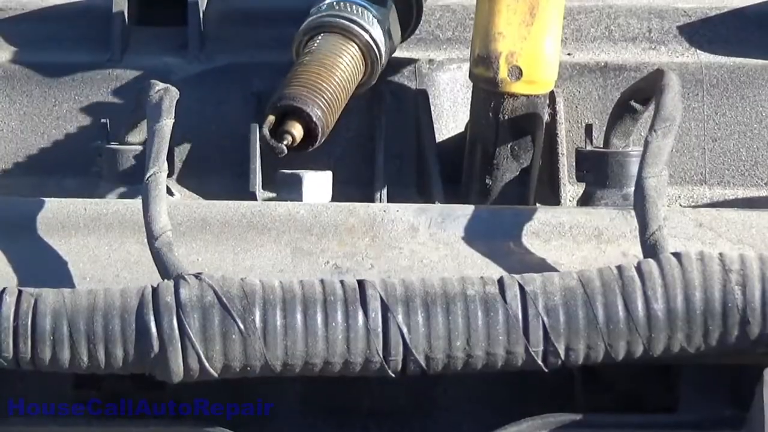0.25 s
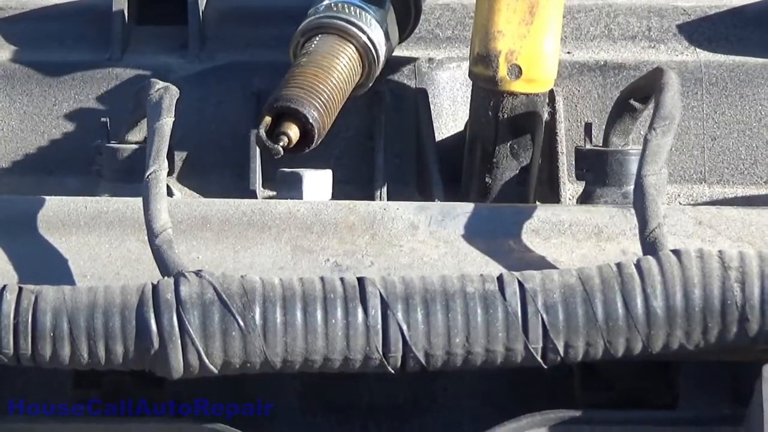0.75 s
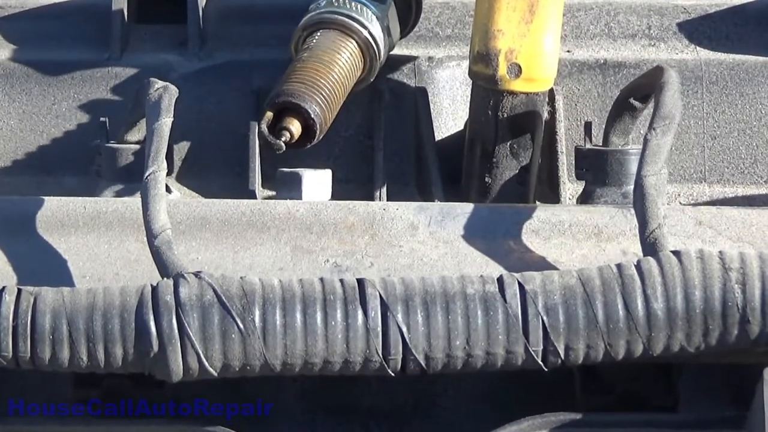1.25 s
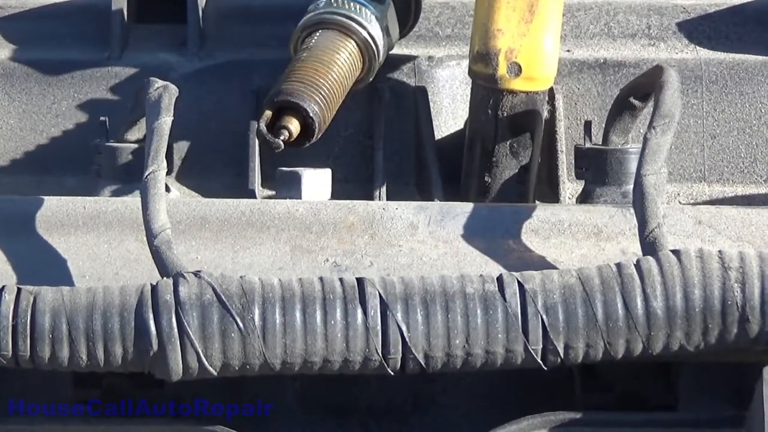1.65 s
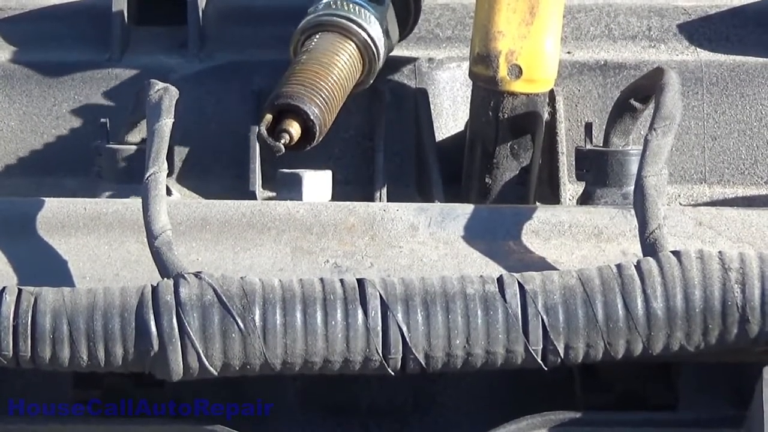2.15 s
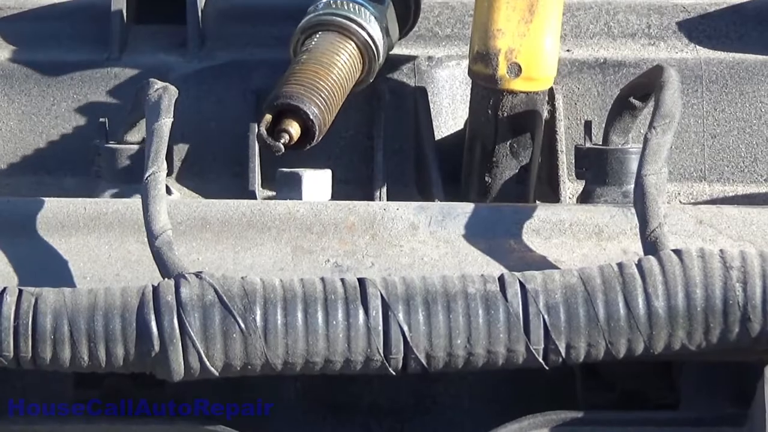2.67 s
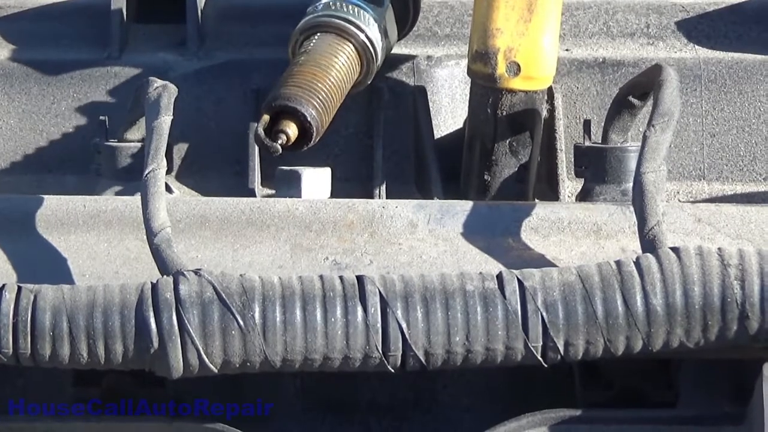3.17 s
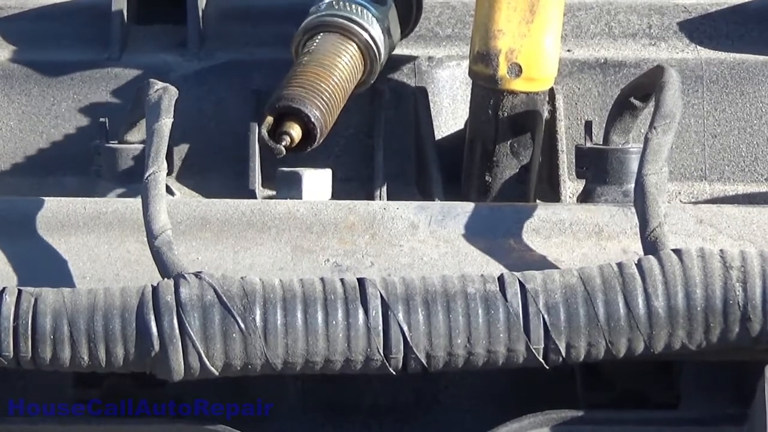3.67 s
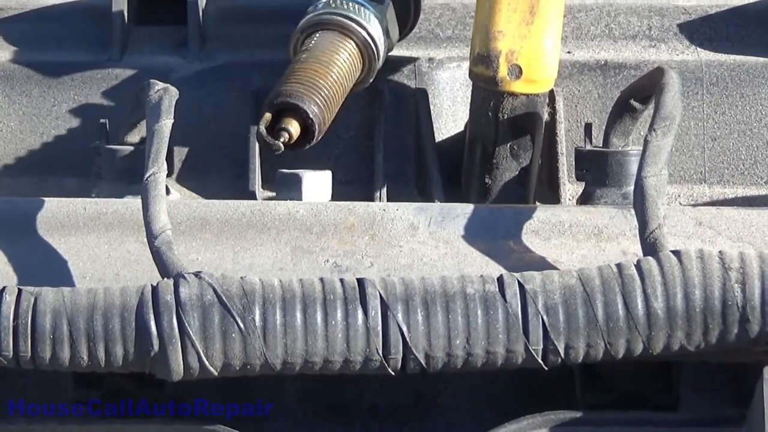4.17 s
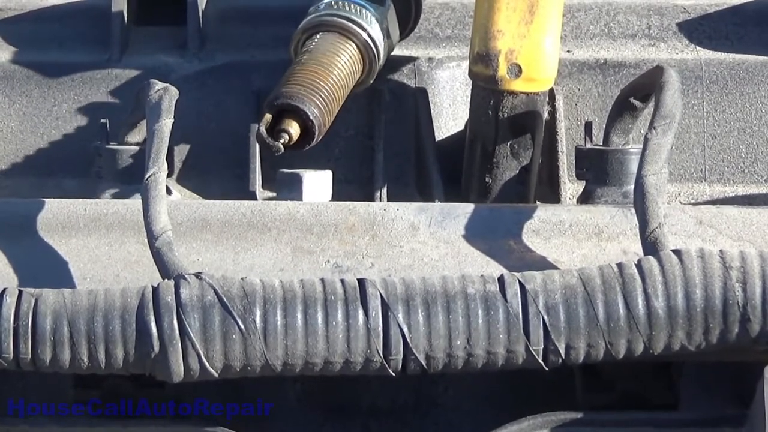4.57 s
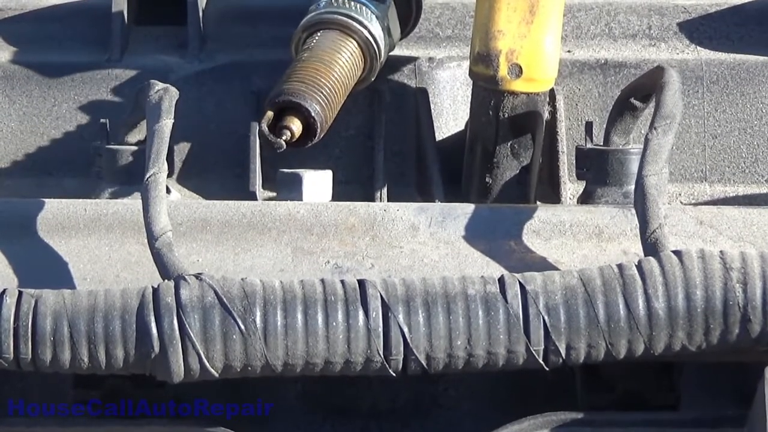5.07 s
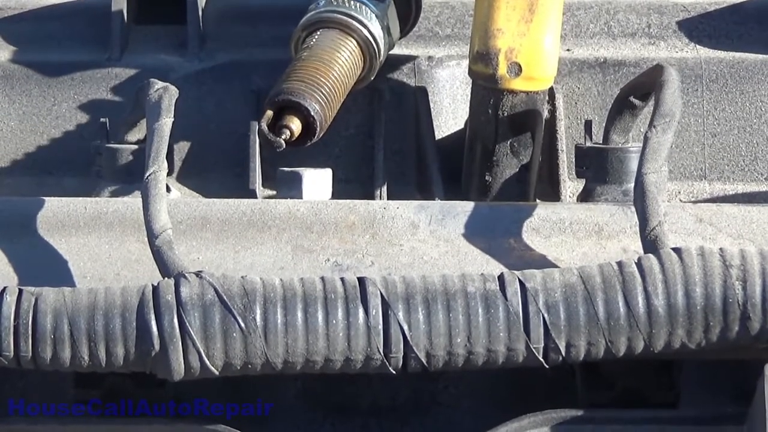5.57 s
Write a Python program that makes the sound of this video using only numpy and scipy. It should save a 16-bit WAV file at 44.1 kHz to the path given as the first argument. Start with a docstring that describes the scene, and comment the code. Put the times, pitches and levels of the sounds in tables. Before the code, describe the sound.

Rapid rhythmic chuffing dominates, each beat a hissing push, a hollow pop, a sharp blast of air and a breathy whistling draw, over a low starter grumble. The beat slows slightly and stops near the end. A metallic click, fading leaks of air, a tiny bird call, faint whine and light wind on the microphone follow, close and dry in open air.

```python
"""Cranking an engine with an open plug hole

A car engine is cranked with one spark plug out. Every half turn air is pushed through the open plug hole
(shaped noise and a whistle), a valve pops (a pulse through resonances), a short blast of noise escapes
and air is drawn back with a lower whistle. A starter gear grumbles until it lets go; the engine coasts
to rest with a few sighs and clicks. A whine, faint street noise, a breeze, a wavering tone and one bird
(swept sine) lie around it."""
import sys
import numpy as np
from scipy import signal
from scipy.fft import rfft, irfft, next_fast_len
from scipy.io import wavfile
from scipy.ndimage import uniform_filter1d, map_coordinates

SR = 44100
rng = np.random.default_rng(int(sys.argv[2]) if len(sys.argv) > 2 else 0)


def dump_mix(stems):
    """Bounce the given channels to the path in sys.argv[1] as a 16-bit WAV at rate SR."""
    frames = np.atleast_2d(stems).T  # one column per channel
    limited = np.clip(frames, -1, 1)  # hard clip at full scale
    pcm = np.round(limited * 32767).astype(np.int16)
    wavfile.write(sys.argv[1], SR, pcm)


N = 257103
T = np.arange(N) / SR  # s


def amp(db):
    """Decibel law: 20 dB is a factor of ten in pressure."""
    return 10 ** (np.asarray(db) / 20)


def unit(x):
    """Normalisation to a root-mean-square value of 1."""
    return x / np.sqrt(np.mean(x ** 2) + 1e-20)


def along(points, hz):
    """Logarithmic pitch axis: (f/Hz, level/dB) points are joined by straight lines in log frequency."""
    f, v = np.transpose(points)
    return np.interp(np.log(hz + 1), np.log(f + 1), v)


def flow(clock, points):
    """Envelope: gain along (clock, level/dB) points, linear in dB and held at the ends."""
    at, db = np.transpose(points)
    return amp(np.interp(clock, at, db))


def filtered(x, response):
    """Linear filtering: the spectrum of x is multiplied by a response that may be complex."""
    m = next_fast_len(N + SR // 2)
    return irfft(rfft(x, m) * response(np.fft.rfftfreq(m, 1 / SR)), m)[..., :N]


def peak(f, hz, width_hz):
    """Damped resonance: a causal second-order response of height 1."""
    return 1j * f * width_hz / (hz * hz - f * f + 1j * f * width_hz)


# air cavities of plug hole and engine bay: f/Hz, width/Hz, lift/dB (scaled by each user's share)
BAY = [(220, 37, -10.5), (347, 18, 4.5), (451, 113, 5), (1804, 160, 8.5), (2240, 16, 0.5), (2730, 100, 9),
       (3048, 146, 7), (3410, 86, 6), (3617, 110, 7.5), (3997, 76, 8.5), (4295, 67, 8.5), (4406, 70, 6.5),
       (4716, 144, 7), (5110, 74, 6), (5506, 91, 9.5), (5710, 40, 13), (6570, 280, 8), (7195, 390, 7.5),
       (7373, 87, 7.5), (7900, 57, 3.5), (8184, 200, 6), (9240, 550, 3.5), (10100, 143, 1.5),
       (10760, 470, 3.5)]


def cavities(f):
    """Cavity resonance: lift in dB, a sum of squared resonance curves."""
    return sum(db * abs(peak(f, hz, width)) ** 2 for hz, width, db in BAY)


# side level used for all the noises, by pitch: f/Hz, side re mid level/dB (before wide_db)
WIDTH = [(60, -32), (200, -40), (380, -32), (700, -15.5), (1290, -14), (1830, -21), (2600, -8.5),
         (4400, -18.5), (8120, -15), (12000, -24.5), (15000, -37)]


def rush(spectrum, eddy_db, eddy_hz, patchy_db, bay=0.98, wide_db=0.):
    """Turbulence noise: eddies make it flutter and favour patches of pitch; bay = share of cavity colour."""
    eddies = rng.standard_normal(int(N * eddy_hz / SR) + 4)
    flutter = map_coordinates(eddies, [np.arange(N) * eddy_hz / SR])
    z = signal.stft(rng.standard_normal((2, N)), nperseg=256)[2]
    # smoothing over neighbouring pitches and moments makes the patches
    field = uniform_filter1d(rng.standard_normal(z.shape[1:]), size=3, axis=0)
    field = uniform_filter1d(field, size=3, axis=1)
    patchy = signal.istft(z * amp(patchy_db * unit(field)), nperseg=256)[1][:, :N]
    air = patchy * amp(eddy_db * flutter)

    def colour(f):
        # the scattered sound from the sides carries less of the cavities' ring
        ring_db = bay * cavities(f) * [[1], [.6]]
        side_db = along(WIDTH, f) + wide_db
        return amp(along(spectrum, f) + ring_db + [0 * f, side_db])

    mid, side = filtered(air, colour)
    return unit(np.array([mid + side, mid - side]))


# colour of the far street: f/Hz, relative level/dB per Hz
STREET = [(290, -15), (500, -3.5), (804, -2.5), (983, -4.5), (1880, -13), (2050, -7), (2140, -14),
          (2810, -15), (2940, -9.5), (3290, -11), (5000, -7), (8760, -14), (15600, -34)]
# its strength: t/s, level/dB rms
STREET_DB = [(4.8, -59), (5.3, -66), (5.6, -67), (5.83, -63)]


def street():
    """Distant sources merging into noise: a shaped random signal whose level drifts slowly."""
    return flow(T, STREET_DB) * rush(STREET, eddy_db=1.0, eddy_hz=29.4, patchy_db=2.2, bay=.4, wide_db=8)


# colour of the breeze: f/Hz, relative level/dB per Hz
BREEZE = [(20, -40), (40, -22), (70, -12), (130, 0.5), (200, -1.5), (330, -7), (470, -9), (600, -21),
          (1300, -120)]
# its strength: t/s, level/dB rms
AIR = [(4.8, -74), (4.95, -78), (5.33, -77), (5.42, -74), (5.46, -66.5), (5.68, -72), (5.745, -80),
       (5.775, -63), (5.83, -60)]


def breeze():
    """Wind noise: turbulence on the microphone, low in pitch and somewhat wider than the other air sounds."""
    return flow(T, AIR) * rush(BREEZE, eddy_db=0.5, eddy_hz=45, patchy_db=2.0, bay=0, wide_db=20.0)


# a faint tone: f/Hz, width/Hz, level/dB rms
WAVERING = (5035, 70, -76)


def wavering_tone():
    """Narrow-band noise: a sharp resonance turns random noise into an unsteady tone."""
    hz, width_hz, db = WAVERING
    return amp(db) * unit(filtered(rng.standard_normal(N), lambda f: peak(f, hz, width_hz) ** 2))


# partials of the electric whine: f/Hz, level/dB rms
WHINE = [(1000, -81), (2000, -73), (3000, -75), (4000, -78.5), (6000, -81), (8000, -81), (9000, -85)]
WHINE_ON = 5.29  # s


def actuator_whine():
    """Harmonic series: an actuator's steady whine is a sum of sines, faded in over 12 ms."""
    whine = sum(np.sqrt(2) * amp(db) * np.sin(2 * np.pi * (hz * T + rng.random())) for hz, db in WHINE)
    return whine * np.clip((T - WHINE_ON) / .012, 0, 1)


# one bird call: t/s, f/Hz, level/dB rms (before the left-right balance)
CHIRP = [(5.15, 6000, -85), (5.162, 5930, -69), (5.18, 5830, -58), (5.19, 5790, -66), (5.198, 5780, -82)]


def bird():
    """Frequency modulation: the phase of a gliding tone is the running sum of its frequency."""
    s, hz, db = np.transpose(CHIRP)
    tone = np.sqrt(2) * np.sin(2 * np.pi * np.cumsum(np.interp(T, s, hz)) / SR)
    return amp(np.interp(T, s, db, -120, -120)) * tone * amp([[2.5], [-2.5]])  # nearer the left


# small metal clicks: t/s, starting level/dB (before the resonance)
TICKS = [(4.508, -21), (5.6874, -52)]


def ticks():
    """Impulsive excitation: parts click as they unload, noise dying 60 dB in 4.7 ms in a broad resonance."""
    out, t = np.zeros(N), np.arange(SR // 200) / SR
    for s, db in TICKS:
        out[round(s * SR):][:len(t)] = amp(db - 60 * t / 0.0047) * rng.standard_normal(len(t))
    return filtered(out, lambda f: peak(f, 7640, 9000))


# last leaks: start t/s, length t/s, sigh level/dB, fizz level/dB (both before the envelope)
SIGHS = [(4.79, 0.053, -64, -64), (4.874, 0.067, -60.5, -74), (5.003, 0.045, -69, -71),
         (5.091, 0.16, -59, -71)]
SIGH_ATTACK_S, SIGH_RELEASE_S = 0.041, 0.095
# colours of the two sounds: f/Hz, relative level/dB per Hz
SIGH = [(290, -52), (500, -22), (782, -1.5), (938, -23), (1100, -2), (1190, -11), (2210, -4), (2780, -3),
        (3380, -15), (5420, -16), (5820, -20), (9000, -20), (11700, -52), (19800, -120)]
FIZZ = [(2940, -30), (5000, -12), (6080, -18), (6590, -4), (10500, -3), (15600, -7)]


def coasting():
    """Leak noise: trapped air escapes in sighs as the pistons settle, each with a brighter fizz."""
    shapes = []
    for s, length, *_ in SIGHS:
        ramp = [(-SIGH_ATTACK_S, -45), (0, 0), (length, 0), (length + SIGH_RELEASE_S, -45)]
        shapes.append(flow(T - s, ramp))
    sigh, fizz = amp(np.array(SIGHS)[:, 2:]).T @ np.array(shapes)
    return (sigh * rush(SIGH, eddy_db=0.1, eddy_hz=151, patchy_db=0.5, bay=0.74, wide_db=4)
            + fizz * rush(FIZZ, eddy_db=-0.3, eddy_hz=150, patchy_db=5.0, bay=.7, wide_db=6))


# colour of the gear noise: f/Hz, relative level/dB per Hz
STARTER = [(35, -51), (60, -21), (210, -7.5), (286, 2), (423, -4), (617, -11.5), (786, -1.5), (1070, -16),
           (1500, -22), (1950, -42), (3300, -120)]
STARTER_DB, STARTER_OFF = -55, 4.5  # dB rms before the fade, s


def starter():
    """Structure-borne noise: the starter gear grumbles through the block until it lets go."""
    fade = np.clip((STARTER_OFF - T) / 0.098, 0, 1)
    return amp(STARTER_DB) * fade * rush(STARTER, eddy_db=2.5, eddy_hz=61.7, patchy_db=4.5)


# half turns: pop t/s, push whistle level/dB, draw whistle level/dB (both before the flow shapes)
TURNS = [(0.0218, -46, -43), (0.1565, -45, -44.5), (0.2895, -51, -40.5), (0.4242, -42, -41),
         (0.558, -48.5, -57), (0.693, -55, -42.5), (0.827, -48, -51), (0.962, -47, -44),
         (1.097, -46.5, -44.5), (1.2314, -52, -43.5), (1.367, -48.5, -40), (1.5015, -51, -43),
         (1.6361, -52, -40.5), (1.7683, -51, -61), (1.9007, -46.5, -39), (2.0302, -57, -45.5),
         (2.1629, -44.5, -42), (2.2952, -43, -58), (2.429, -46.5, -41), (2.5617, -48.5, -46),
         (2.6951, -49.5, -47), (2.8283, -48, -44), (2.9609, -47, -42.5), (3.0927, -51, -40),
         (3.2275, -44, -47), (3.362, -49, -56), (3.497, -47, -37.5), (3.6328, -43, -51), (3.77, -51, -36.5),
         (3.9074, -52, -67), (4.045, -49.5, -47), (4.1832, -42.5, -44.7), (4.3253, -46.5, -54),
         (4.4805, -48.5, -45.5), (4.7225, -57, -51)]
TURN_S = 0.134  # usual half turn
LEAD_S, LEAD_GROWS = 0.0487, 0.53  # the valve opens so long before the pop; extra lead per extra turn time
SLOW_FROM_S = .053  # a lead over this marks a coasting crank; twice this is a stall


def pace():
    """Kinematics: each half turn's valve lead in s, and how near it is to a stall (0-1)."""
    pop = np.transpose(TURNS)[0]
    turn_s = np.diff(pop, prepend=pop[0] - TURN_S)
    lead = LEAD_S + LEAD_GROWS * (turn_s - TURN_S)
    return lead, np.clip(lead / SLOW_FROM_S - 1, 0, 1) ** .5


# phases are in half turns from the pop
VALVE_PHASE, SWELL_PHASE, BLAST_PHASE = -.36, -.27, .125
DRAWN_PHASE = .42  # the draw begins to die
DRAWN_S, DRAWN_STALL_S = .0563, .052  # that moment after the pop, and how much later at a stall


def crank():
    """Phase and time: matching times and counts of half turns; the pop marks each whole number."""
    pop = np.transpose(TURNS)[0]
    lead, slow = pace()
    count = np.arange(len(pop))
    # the push swells in a set time however slow the crank; blast and draw last longer on slow turns
    blast_end = pop + 0.00436 + .255 * lead
    drawn = pop + DRAWN_S + DRAWN_STALL_S * slow
    times = [pop - lead, pop - lead + 0.01229, pop, blast_end, drawn]
    counts = [count + VALVE_PHASE, count + SWELL_PHASE, count, count + BLAST_PHASE, count + DRAWN_PHASE]
    return (np.append(np.ravel(times, order="F"), pop[-1] + .13),
            np.append(np.ravel(counts, order="F"), count[-1] + .499))


# pressure steps in the intake: phase from the pop/half turns, level/dB (before scatter and stall loss)
THUDS = [(-.5, -26.5), (-.36, -8), (-.24, -27), (0, -1.5), (0.127, -13.5), (0.249, -34), (0.332, -38)]
# intake resonances: f/Hz, width/Hz, relative level/dB
INTAKE = [(459, 204, 0.5), (351, 107, -11.5), (800, 120, -22.5), (116, 128, -30)]
POP_DB, POP_STALL_DB, POP_SCATTER_DB = -27, -11.5, 0.66  # driven pulse, loss at a stall, scatter by turn
OPEN_STALL_DB = -6  # a slow crank opens the valve more softly


def valves():
    """Impulse response: each valve event sends a short suction pulse into the resonant intake."""
    times, counts = crank()
    slow = pace()[1]
    phase, thud_db = np.transpose(THUDS)
    at = np.interp(np.arange(len(TURNS))[:, None] + phase, counts, times) - .0009
    pop_db = POP_DB + POP_STALL_DB * slow + POP_SCATTER_DB * rng.standard_normal(len(TURNS))
    soft_db = OPEN_STALL_DB * slow[:, None] * (phase < 0)
    vary_db = 1.1 * (phase != 0) * rng.standard_normal(at.shape)  # every event but the pop itself
    level = pop_db[:, None] + thud_db + soft_db + vary_db
    heard = at > 0
    kicks = np.bincount(np.round(at[heard] * SR).astype(int), -amp(level[heard] + 1), N)

    def intake(f):
        ring = sum(amp(db) * peak(f, hz, width) * SR / (np.pi * width) for hz, width, db in INTAKE)
        dip = 1 - .5 * peak(f, 219, 118)
        low_cut, high_cut = 1j * f / (90 + 1j * f), 1 / (1 + 1j * f / 1200) ** 2
        return ring * dip * low_cut * high_cut

    return filtered(kicks, intake)


def whistle(phase, hz, wander_hz, glide_hz):
    """Edge tone: a jet on an edge sings at a pitch that wanders and sinks through each half turn."""
    drift = map_coordinates(rng.standard_normal(N // 400 + 4), [np.arange(N) / 400])
    pitch = hz + wander_hz * drift + glide_hz * phase
    return np.sqrt(2) * np.sin(2 * np.pi * np.cumsum(pitch) / SR)


# the two edge tones, one row each: f/Hz, wander/Hz, glide/Hz per half turn
PUSH_NOTE = (2440, 13.76, -120)
DRAW_NOTE = (1825, 16.64, -40)
# colours of blast (first, last), push (early, late) and draw: f/Hz, relative level/dB per Hz
BLAST = [(88, -49), (150, -22), (596, -8), (1130, -14.5), (1840, -5.5), (4160, -9.5), (5350, -21.5),
         (7300, -3), (8370, -6.5), (8870, -12.5), (11000, -5), (15600, -20.5)]
BLAST_END = [(88, -50), (150, -13), (1150, -16.5), (1730, -4), (3050, -8.5), (4240, -1.5), (6010, -22.5),
             (6500, -12), (8210, -0.5), (8870, -7.5), (12100, -8.5), (15600, -27)]
EARLY = [(88, -48), (150, -22), (541, -5), (1270, -10), (1990, -6), (2460, -16.5), (3050, -25), (4490, -13),
         (6130, -7), (8530, 3.5), (13900, -11.5), (15600, -24)]
LATE = [(88, -58), (150, -44), (454, -27), (1110, -18.5), (1730, -7.5), (1990, -33), (2410, -2.5),
        (3110, -13), (4490, 4), (6130, -4.5), (7160, -8), (15600, -21)]
DRAW = [(35, -50), (60, -25), (351, 1), (476, -1.5), (1180, -4), (1830, 1.5), (2720, -1.5), (4230, -1.5),
        (5340, -9), (7580, -0.5), (10300, -3), (15600, -16.5)]
# strength of each flow and note through one half turn: phase from the pop/half turns, relative level/dB
JET_FLOW = [(-.12, -45), (-.01, -6.5), (.07, 2.5), (.105, -1.5), (.125, -9), (.17, -41)]
EARLY_FLOW = [(-.41, -49), (-.335, -5), (-.285, 0.5), (-.2, -6), (-.04, -13), (.0, -45)]
LATE_FLOW = [(-.42, -47), (-.31, -7), (-.19, 0.56), (-.05, -5.5), (.0, -16), (.07, -42)]
DRAW_FLOW = [(.07, -45), (.125, 2.3), (.17, -3), (.25, -3), (.32, -1), (.38, -4), (.46, -15), (.6, -42)]
LEAK_FLOW = [(-.6, -45), (-.5, -16.5), (-.46, -5.5), (-.4, 2.5), (-.37, -1.5), (-.34, 0), (-.18, -41)]  # ahead of the valve
PUSH_SINGS = [(-.38, -45), (-.31, 1.5), (-.22, 5), (-.1, 4), (-.04, 1.5), (.04, -42)]
DRAW_SINGS = [(-.48, -40), (-.4, -2), (-.365, -6), (-.2, -46), (.0, 0.5), (.07, 0), (.2, -37), (.33, -0.5),
              (.41, 1.5), (.5, -34)]
# the blast changes from its first colour to its last: start, end phase/half turns
HANDOVER = (0.042, 0.1)
# levels before the flow shapes, and their change at a stall
JET_DB, JET_STALL_DB = -26, -9.5
PUSH_DB, PUSH_STALL_DB = -30.5, -3.5
DRAW_DB, DRAW_STALL_DB = -38.5, -14.5
FLOW_SCATTER_DB = 0.5
SING_STALL_DB, PUSH_SAG_DB = -60, -25  # a slow push loses its note and fades sooner: dB per half turn


def open_cylinder():
    """Piston-driven jet noise: the flow repeats its shape each half turn and weakens as the crank stalls."""
    times, counts = crank()
    turns = np.interp(T, times, counts)
    which = np.round(turns).astype(int)
    last_pop = np.clip(turns, 0, None).astype(int)  # the draw lasts from one pop to the next push
    phase = turns - which
    stall = pace()[1]
    slow = stall[which]
    _, high_db, low_db = np.array(TURNS)[which].T
    scatter = FLOW_SCATTER_DB * rng.standard_normal((len(TURNS), 3))
    blast_db = JET_DB + JET_STALL_DB * slow ** 4 + scatter[which, 0]
    push_db = PUSH_DB + PUSH_STALL_DB * slow + scatter[which, 1]
    draw_db = DRAW_DB + DRAW_STALL_DB * stall[last_pop] + scatter[last_pop, 2]
    # a slowing crank leaks less ahead of the valve and starts its push brighter
    leak_db = -7 * slow * (phase < 0)
    early_db = push_db - 4.0 + 4.5 * slow
    late_db = push_db + PUSH_SAG_DB * slow * (phase - SWELL_PHASE - .09)
    high_db = high_db + SING_STALL_DB * slow * (phase - SWELL_PHASE)
    # too little flow to hold the low note
    low_db = low_db + leak_db - 14 * slow ** 4 * (phase > BLAST_PHASE)

    turn = np.pi / 2 * np.interp(phase, HANDOVER, [0, 1])  # equal-power crossfade
    jet = (np.cos(turn) * rush(BLAST, eddy_db=0.5, eddy_hz=599, patchy_db=2.0)
           + np.sin(turn) * rush(BLAST_END, eddy_db=1.0, eddy_hz=613, patchy_db=3))
    blast = flow(phase, JET_FLOW) * amp(blast_db) * jet
    early = flow(phase, EARLY_FLOW) * amp(early_db) * rush(EARLY, eddy_db=2.0, eddy_hz=403, patchy_db=4)
    late = flow(phase, LATE_FLOW) * amp(late_db) * rush(LATE, eddy_db=1.5, eddy_hz=301.3, patchy_db=1.5)
    draw_flow = flow(phase % 1, DRAW_FLOW) + flow(phase % 1 - 1, LEAK_FLOW)
    draw = draw_flow * amp(draw_db + leak_db) * rush(DRAW, eddy_db=0.33, eddy_hz=295, patchy_db=2.0)
    high = flow(phase, PUSH_SINGS) * amp(high_db) * whistle(phase + 0.12, *PUSH_NOTE)
    low = flow(phase, DRAW_SINGS) * amp(low_db) * whistle(phase - .36, *DRAW_NOTE)
    moving = T < times[-1]
    return moving * (blast + early + late + draw + high * amp([[-2.5], [2.5]]) + low)


def scene():
    """Superposition: the surroundings and the engine's sources add; small left-right balances place them."""
    surroundings = street() + breeze() + wavering_tone() + actuator_whine() + bird()
    engine = ticks() + coasting() + starter() + valves() * amp([[-.15], [.15]]) + open_cylinder()
    return surroundings + engine * amp([[-.12], [.12]])


def record(dry):
    """Band limitation: nothing at or above 15.73 kHz is kept."""
    return filtered(dry, lambda hz: hz < 15730)


dry = scene()
out = record(dry)
dump_mix(out)
```